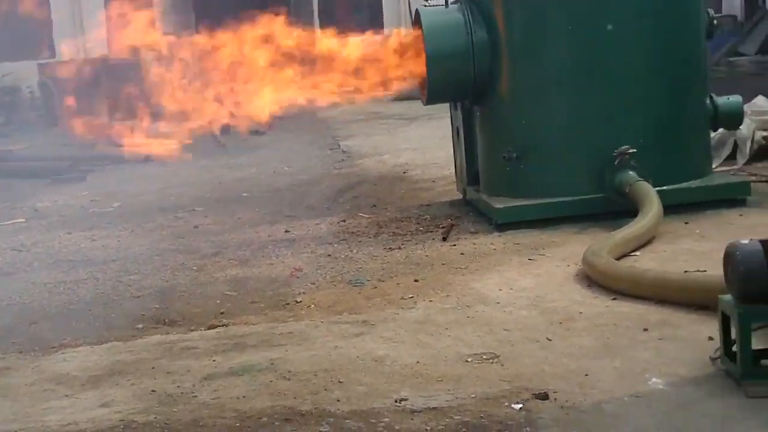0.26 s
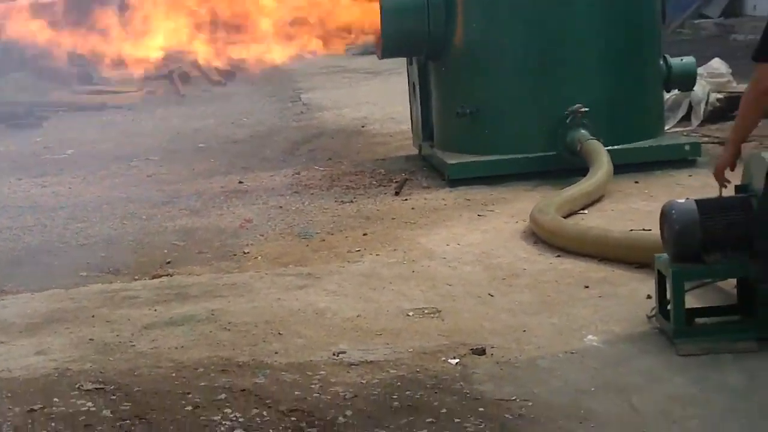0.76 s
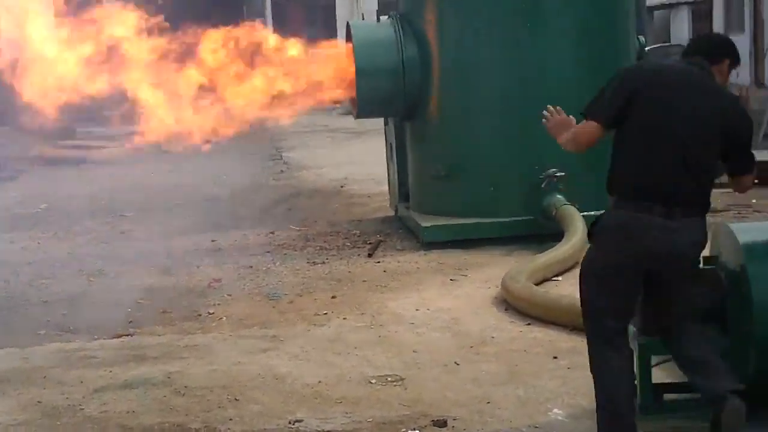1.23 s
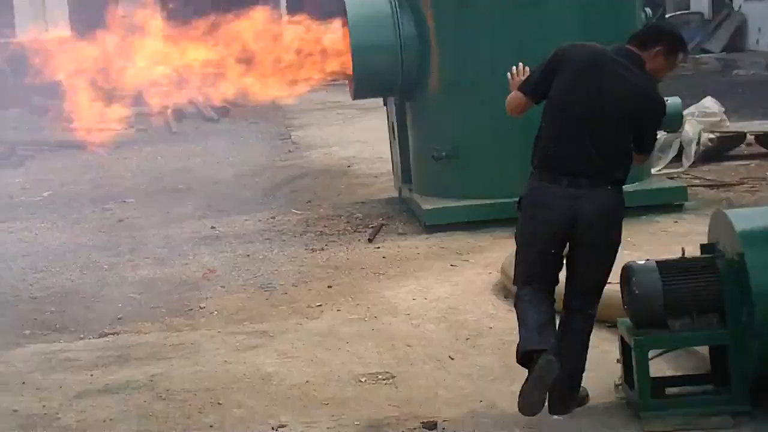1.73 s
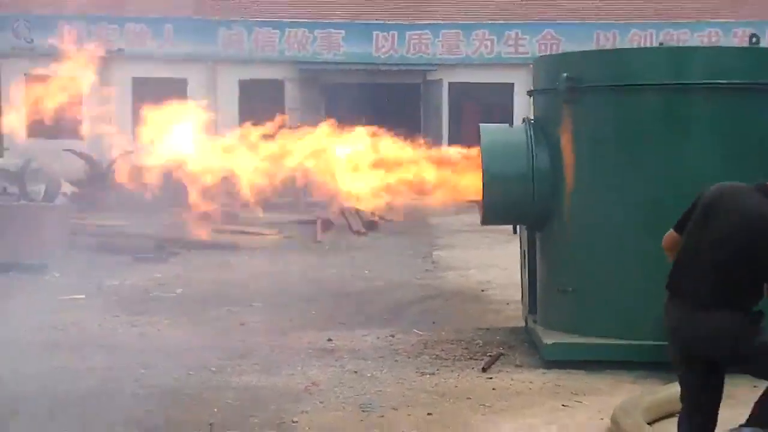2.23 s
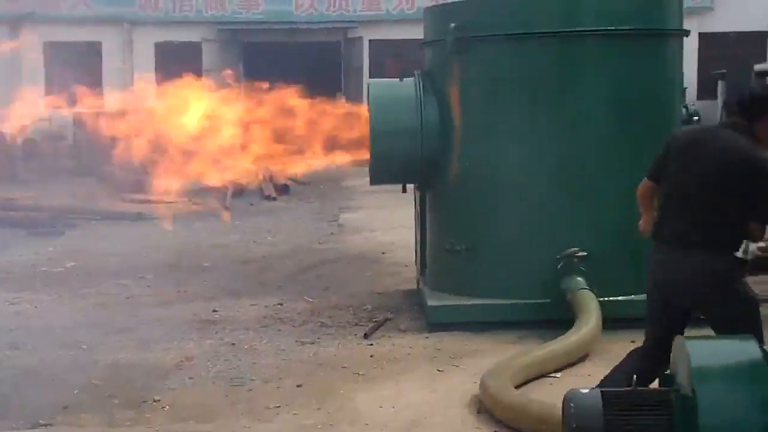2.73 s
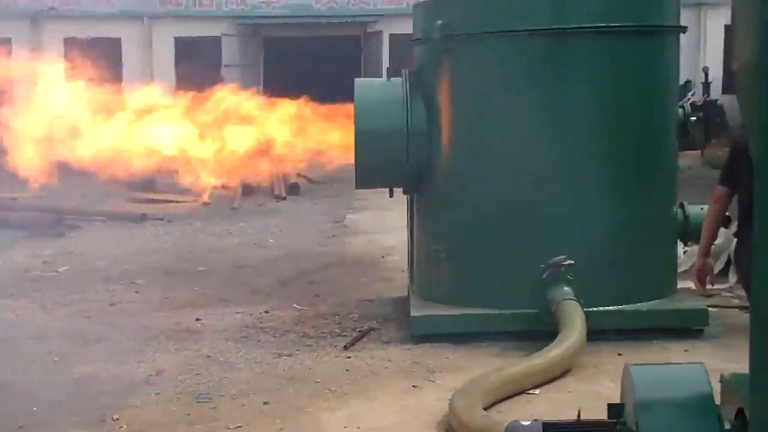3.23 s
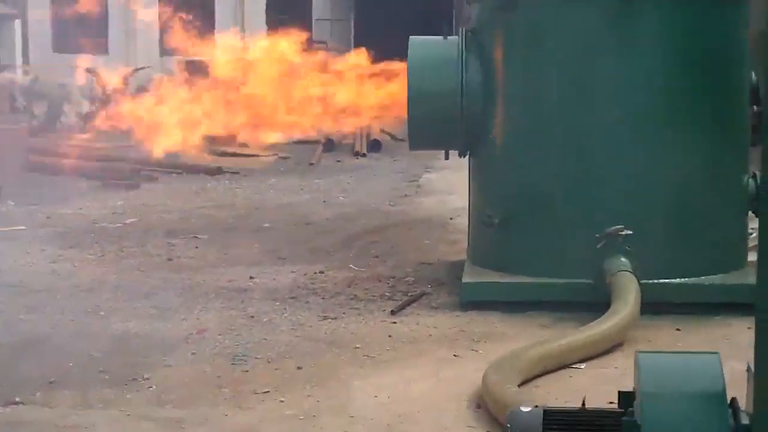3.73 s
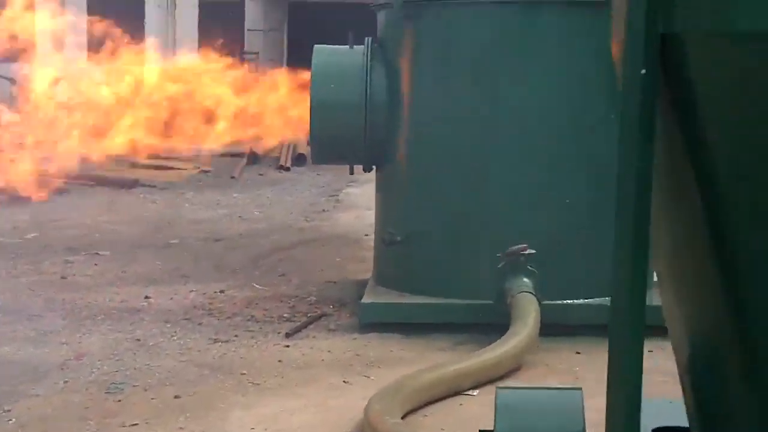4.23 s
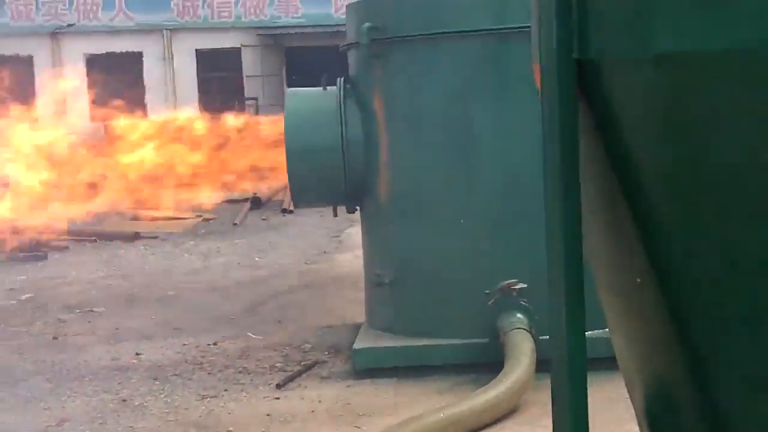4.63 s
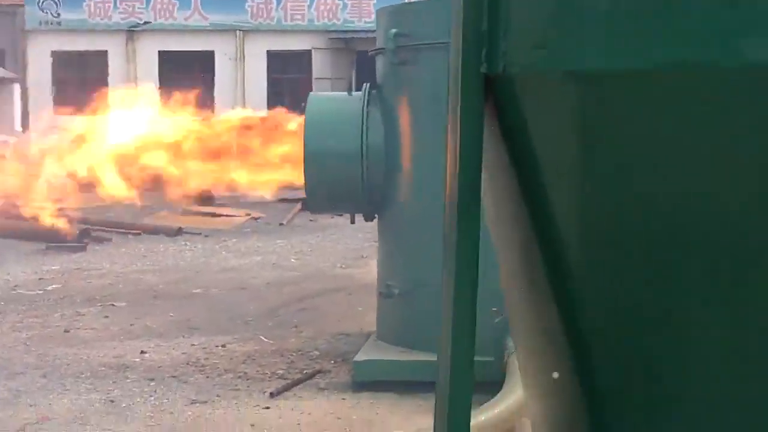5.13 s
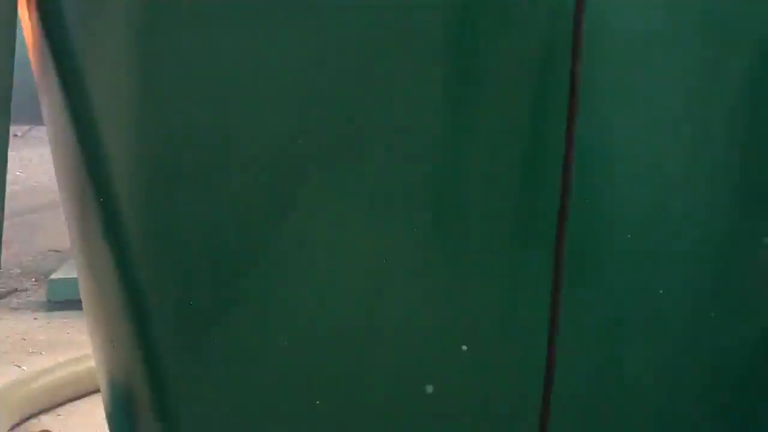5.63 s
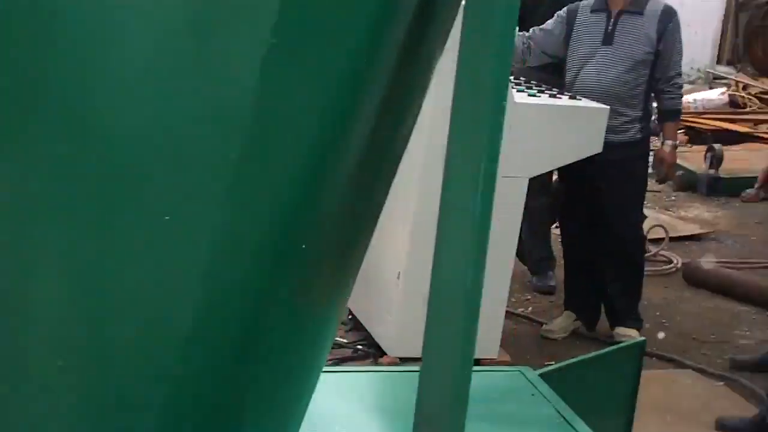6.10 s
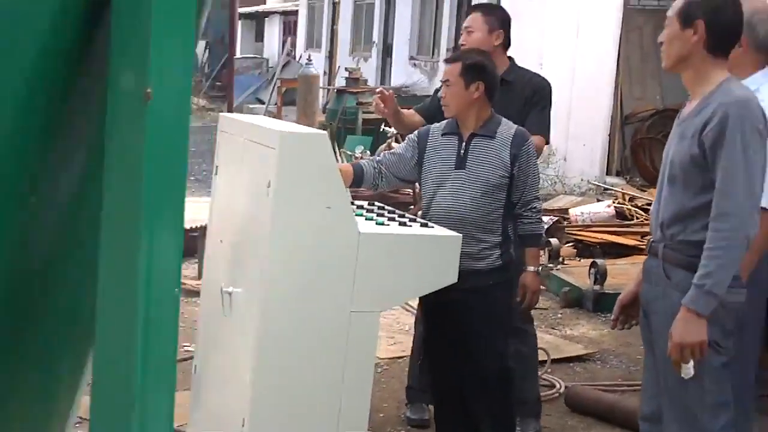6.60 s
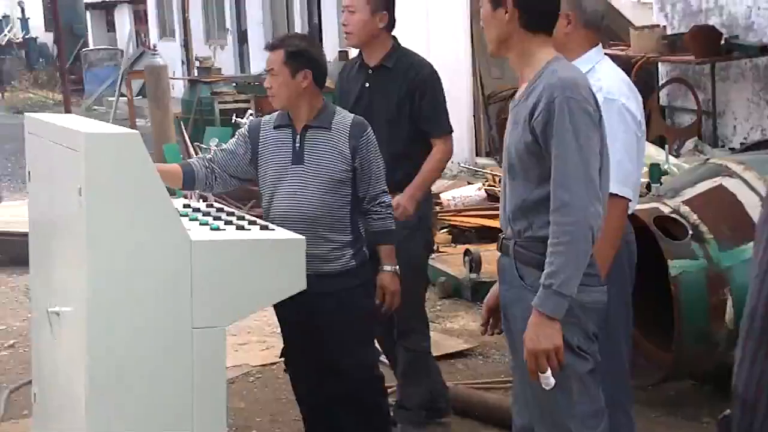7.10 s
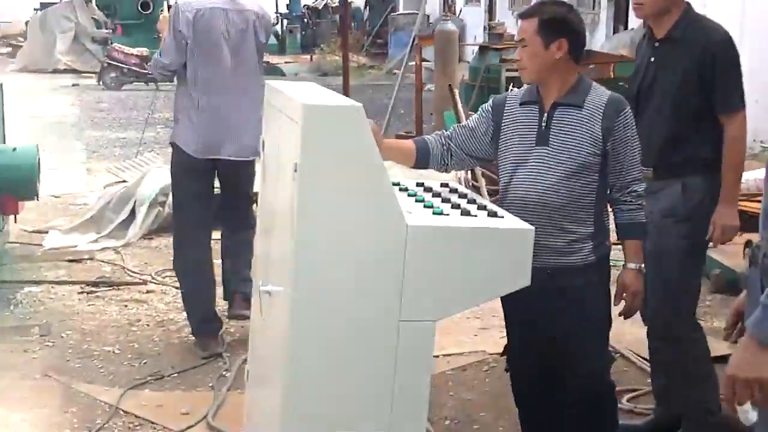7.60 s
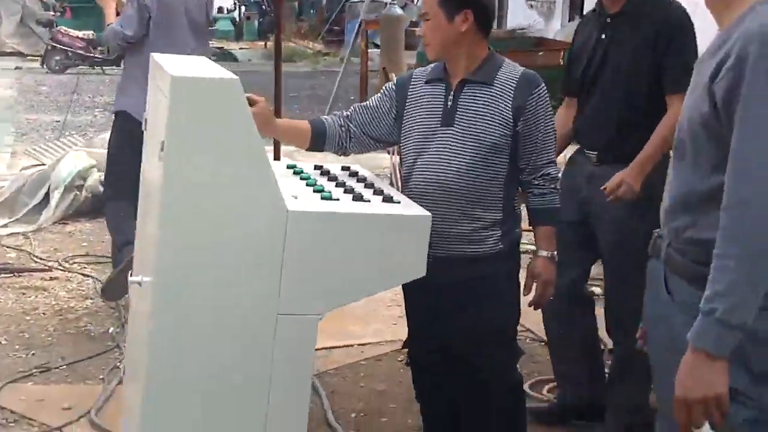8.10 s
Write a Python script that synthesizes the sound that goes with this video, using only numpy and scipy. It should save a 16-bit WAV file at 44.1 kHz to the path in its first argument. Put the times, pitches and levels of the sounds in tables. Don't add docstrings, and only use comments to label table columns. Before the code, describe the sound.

In a hard-walled factory yard, a large burner blasts a continuous low, lumpy roar with soft hiss over a wavering blower hum and faint motor whine. Small chips tick on steel from the start; from two seconds louder chunks crack close to the phone microphone, densest between three and six seconds. The roar loses its open edge behind a hopper as the blower swells, and a hollow knock and tumbling chunks end it.

```python
import sys
import numpy as np
from scipy import signal
from scipy.fft import rfft, irfft
from scipy.io import wavfile
from scipy.ndimage import uniform_filter1d

SR = 44100
rng = np.random.default_rng(int(sys.argv[2]) if len(sys.argv) > 2 else 0)


def gain_from_decibels(decibels):
    exponent = np.asarray(decibels, float) / 20
    return 10 ** exponent


def file_out(sig):
    cols = np.atleast_2d(sig).T
    lim = np.clip(cols, -1, 1)
    pcm = np.round(lim * 32767).astype(np.int16)
    wavfile.write(sys.argv[1], SR, pcm)


N = 368235

# pitch_hz, density_db [dB per Hz]
RUMBLE_SPECTRUM = [(10, -8), (22, -1.5), (32, 3), (55, 3.5), (90, -4), (150, -29.5), (300, -81.5)]
BODY_SPECTRUM = [(40, -17), (80, -2), (125, 1.5), (180, -1), (260, -7.5), (400, -23.5), (800, -55)]
THROAT_SPECTRUM = [(150, -19), (300, -9), (400, -2), (520, -3.5), (700, 2.5), (950, -6.5), (1200, -19),
                   (1800, -16), (4000, -57)]
HISS_SPECTRUM = [(500, -29), (1000, 0.5), (1500, -1.5), (2200, -6), (3000, -4), (4000, -9.5), (5000, -11.5),
                 (6000, -15.5), (7000, -25.5), (9000, -64.5)]
# pitch_hz, density_db [dB per Hz]
SHADED_THROAT_SPECTRUM = [(150, -26.5), (300, 6), (400, -0.5), (520, -1), (700, -4), (950, -10),
                          (1200, -14.5), (1800, -13.5), (4000, -62.5)]
SHADED_HISS_SPECTRUM = [(500, -27.5), (1000, -4), (1500, -2.5), (2200, -0.5), (3000, -4), (4000, -7.5),
                        (5000, -8.5), (6000, -21.5), (7000, -27.5), (9000, -62)]
# start_s, share [0-1]
HOPPER_SHADE = [
    (0, 0),
    (4.9, 0.04),
    (6.1, 1),
    (8.35, 1),
]
# start_s, draught_db
DRAUGHT = [(0.0, -20), (0.11, -17.5), (0.28, -25.5), (0.42, -17), (0.93, -21), (1.6, -16.5), (1.7, -23.5),
           (1.84, -16), (3.32, -17.5), (3.37, -16), (3.81, -21.5), (3.86, -16.5), (5.02, -19.5),
           (5.3, -16.5), (5.32, -19), (8.35, -22.5)]
# start_s, flow_db
FUEL_FLOW = [(0.0, -39), (0.51, -37), (0.86, -40.5), (1.95, -36), (2.14, -39.5), (3.14, -38.5),
             (3.37, -37.5), (3.51, -36), (3.65, -35), (4.47, -36.5), (4.7, -34), (5.49, -37), (5.7, -33.5),
             (6.09, -37), (6.44, -31.5), (6.56, -38), (7.46, -39.5), (8.35, -34.5)]
# level_db, draught_share, fuel_share [both of the swing in dB], hopper_change_db
EDDY_LEVELS = [
    (-20, 0.87, 0.043, 3.5),
    (-20, .8, 0.053, -1.5),
    (-31, 0.4, 0.36, 4),
    (-34.5, 0.14, .9, -1.1),
]

# start_s, level_db
BLADE_LEVEL = [(0.0, -21), (0.75, -26), (1.3, -32), (1.65, -19), (2.39, -29.5), (2.63, -22), (2.95, -28),
               (3.3, -22), (3.72, -35), (4.04, -22.5), (4.47, -34.5), (4.58, -24.5), (4.86, -37),
               (5.25, -17), (5.74, -21.5), (6.05, -12.5), (7.46, -13), (7.81, -21)]
# start_s, level_db
OCTAVE_LEVEL = [(0.0, -49), (0.4, -40), (0.72, -31), (1.2, -45), (1.85, -37.5), (2.5, -49), (4.8, -39),
                (5.28, -32), (5.6, -48), (5.86, -29), (6.1, -40.5), (6.9, -32.5), (7.44, -32.5),
                (7.68, -38.5), (8.35, -31)]
# start_s, level_db
WHINE_LEVEL = [(0.0, -50), (0.55, -40), (0.75, -52), (1.6, -46), (3.0, -50.5), (3.45, -40), (4.0, -46),
               (4.14, -36), (4.6, -40), (4.95, -31), (5.45, -38.5), (5.67, -31), (6.1, -48.5),
               (6.28, -36.5), (6.98, -45.5), (7.1, -34), (7.33, -44), (8.35, -46.5)]
# pitch_hz, level_db [rms], fade_start_s, drift_hz_per_s
CASING_HUMS = [
    (338.6, -45.5, 0.63, 2),
    (377.4, -37, 0.86, 17),
    (934, -52, 9, 3),
    (1199, -51.5, 9, 0),
    (1288, -51, 9, -0.5),
    (1730, -55, 9, -0.5),
]

# start_s, peak_db, ring_hz [loudest], panel_db [low panel share], extra_treble_db
BIG_CRACKS = [(1.9942, -8, 2820, -10.5, -5), (3.093, -11, 4150, -6.5, 2.5), (3.317, -4.5, 2380, -8, 5),
              (3.407, -2, 3240, -8, -2), (3.635, -10.5, 2980, -4.5, -2), (4.677, -13, 2400, -24, -4.5),
              (4.8593, -11, 3570, -7, -2), (5.1401, -11.5, 3260, -2.5, -2.5),
              (5.2346, -11.5, 1900, -10.5, -4), (5.5138, -9, 2665, -1, 3), (5.665, -5, 1670, 0, 2),
              (5.8145, -11.5, 1940, -8, -4)]
# start_s, peak_db, ring_hz [loudest], panel_db [low panel share]
CHUNK_KNOCKS = [(0.3153, -19, 1867, -14), (0.482, -18, 1710, -19.5), (0.7093, -20, 1750, -35),
                (1.511, -16.5, 2590, -17), (1.594, -17, 1750, -25), (1.956, -16.5, 2570, -14),
                (2.4595, -16, 2770, -21), (2.6235, -14, 1580, -4.5), (2.6976, -16.5, 2880, -7),
                (3.5304, -14, 3540, -7), (3.6057, -16, 1468, -11.5), (4.5759, -18.5, 3240, -2.5),
                (6.114, -16.5, 2740, -6), (6.31, -17.5, 1750, -2), (6.402, -14, 2540, -6),
                (6.445, -22.5, 3520, -4.5), (6.496, -20.5, 4000, -10.5), (6.5499, -18, 3850, -30.5)]
# start_s, peak_db, ring_hz [loudest]
CHIP_TICKS = [(0.1495, -21, 1750), (0.391, -22.5, 1840), (1.2535, -21, 2560), (1.3648, -22, 1930),
              (1.4726, -24, 1840), (1.6687, -25, 3740), (2.5337, -17.5, 1500), (3.8922, -21, 1500),
              (4.0278, -18.5, 1450), (4.2765, -34, 1662), (4.6038, -24.5, 3340), (5.038, -40, 1620),
              (5.7845, -15, 1490), (5.9953, -29, 2100), (6.0464, -22.5, 1800), (6.092, -26, 1720),
              (6.2642, -19.5, 2620), (6.774, -19, 1440), (6.8609, -22, 2590), (6.9187, -23, 1490),
              (7.1403, -26.5, 1950), (7.3776, -24.5, 1740), (8.208, -26, 2780), (3.9665, -21, 2200),
              (4.2322, -29, 1740), (5.069, -22.5, 3310), (6.962, -23.5, 1450), (5.73, -27.5, 3480),
              (6.376, -25, 2100)]
# start_s, peak_db, ring_hz [loudest], blow_ms
CHUNK_TUMBLES = [(1.0898, -25.5, 2670, 17), (1.171, -21, 3193, 29), (1.768, -25, 2880, 24),
                 (1.8406, -14, 1750, 13.5), (3.7741, -25, 2784, 23), (4.137, -22, 3050, 17),
                 (5.4115, -18.5, 1750, 40), (6.343, -14, 1750, 18), (7.0739, -19.5, 1830, 23),
                 (7.6604, -7.5, 1800, 18), (7.705, -21.5, 2130, 24), (7.7438, -20, 2900, 25),
                 (7.79, -22.5, 2390, 34), (7.874, -17, 1940, 21), (8.112, -18.5, 1560, 24),
                 (8.29, -9.5, 1716, 21)]
# start_s, peak_db, ring_hz
FAR_THUD = [
    (7.492, -20, 738),
    (7.509, -29, 1140),
]
# ring_hz, treble_db
SPOT_TREBLE = [(1450, -9), (1750, -9), (1900, -9), (2450, -13), (2750, -12.5), (2950, -5.5), (4000, -10)]
# ring_hz, level_db, t60_s
CLEAR_MODES = [(910, 7.5, 0.65), (935, 9.5, 0.11), (1030, -1, 0.22), (1750, 6.5, 0.35), (1840, -3.5, 0.22),
               (2950, 3.5, 0.018), (4560, 2, 0.44)]
# ring_hz, t60_s
SHEET_T60 = [(800, 0.35), (2000, 0.12), (4000, 0.086), (7000, 0.038)]

# pitch_hz, step_db
ROUNDING_STEP = [(2500, -28), (3500, -1.5), (4200, .9), (5500, 1.6), (6500, .6), (7100, 0), (7250, 9),
                 (7400, 30)]


def flame():
    behind = np.clip(curve(HOPPER_SHADE, count=1), 0, 1)
    rumble = turbulence(RUMBLE_SPECTRUM, patchy_db=1.53, flicker_db=0.66, flicker_hz=5.2, size=4096)
    body = turbulence(BODY_SPECTRUM, patchy_db=1.3, flicker_db=-0.8, flicker_hz=26.2, size=2048)

    roar = dict(patchy_db=1.3, flicker_db=0.1, flicker_hz=8.3, size=1024)
    throat = walk_round(turbulence(THROAT_SPECTRUM, **roar), turbulence(SHADED_THROAT_SPECTRUM, **roar), behind)
    fine = dict(patchy_db=1.0, flicker_db=1.52, flicker_hz=30.8, size=512)
    hiss = walk_round(turbulence(HISS_SPECTRUM, **fine), turbulence(SHADED_HISS_SPECTRUM, **fine), behind)

    controls = np.array([np.ones(N), swing(DRAUGHT), swing(FUEL_FLOW), behind])
    levels_db = np.array(EDDY_LEVELS) @ controls
    return (gain_from_decibels(levels_db) * [rumble, body, throat, hiss]).sum(axis=0)


def turbulence(spectrum, patchy_db, flicker_db, flicker_hz, size):
    frames, hz = 4 * N // size + 5, np.fft.rfftfreq(size, 1 / SR)
    real, imaginary, patches = rng.standard_normal((frames, len(hz), 3)).T
    patches = uniform_filter1d(patches, size=9, axis=0)
    patches = evened(uniform_filter1d(patches, size=9, axis=1))
    level_db = read(spectrum, hz)[:, None] + patchy_db * patches
    z = (real + 1j * imaginary) * gain_from_decibels(level_db)
    x = signal.istft(z, nperseg=size, noverlap=3 * size // 4)[1][:N]
    return evened(x * gain_from_decibels(flicker_db * wander(flicker_hz)))


def walk_round(front, back, behind):
    turn = np.pi / 2 * behind
    return np.cos(turn) * front + np.sin(turn) * back


def feed():
    steel = sheet_steel()
    blows = [(*row, 9.9, extra_db) for *row, extra_db in BIG_CRACKS]
    blows += [(*row, 10.3, 0) for row in CHUNK_KNOCKS]
    blows += [(*row, -8.5, 9.2, 0) for row in CHIP_TICKS]
    # panel -9 dB, treble duller by 3 dB
    blows += [(s, db, hz, -9, ms, -3) for s, db, hz, ms in CHUNK_TUMBLES]

    out = np.zeros(N)
    for s, db, hz, panel_db, ms, extra_db in blows:
        treble_db = read(SPOT_TREBLE, hz) + extra_db
        blow = knock(steel, hz, panel_db, treble_db, ms, rng.standard_normal(9400))
        add(out, s - .001, gain_from_decibels(db) * blow)
    soft_start = np.minimum(np.arange(9000) / SR / 0.0046, 1)
    for s, db, hz in FAR_THUD:
        add(out, s, gain_from_decibels(db) * soft_start * ring(hz, 0.15)[0])
    return out + gain_from_decibels(-48) * evened(patter(steel, hits_per_s=17))


def patter(steel, hits_per_s):
    size = gain_from_decibels(3.5 * np.minimum(rng.exponential(1, N), 1.6)) * (rng.random(N) < hits_per_s / SR)
    kind = rng.integers(0, 12, N)
    out = np.zeros(N)
    for k, hz in enumerate(np.geomspace(1600, 5000, 12)):
        chip = knock(steel, hz, -6.0, -6.0, 9.0, rng.standard_normal(9400))
        out += signal.oaconvolve(size * (kind == k), chip)[:N]
    return out


def knock(steel, ring_hz, panel_db, treble_db, blow_ms, chance):
    hz, db, rings = steel
    colour = [(500, panel_db - 15), (700, panel_db + 4.5), (900, panel_db + 10.5), (1250, panel_db + 7.5),
              (1700, 0.0069), (3000, 0.012),
              (4600, treble_db + 7.5), (5800, treble_db + 4.5), (7200, treble_db - 8.5)]
    weight = gain_from_decibels(db + read(colour, hz)) * np.tanh(1.4 * chance[:len(hz)])
    answer = weight @ rings + gain_from_decibels(11) * ring(ring_hz, 0.13)[0]

    u = np.arange(len(answer)) / SR * 1000 / np.clip(blow_ms, .5, 30)
    f = np.fft.rfftfreq(len(u), 1 / SR)
    swell_db = 5.3 * np.exp(-((f - ring_hz) / 480) ** 2)
    splinters = rfft(chance[-len(u):]) * gain_from_decibels(read(colour, f) + swell_db)
    splinters = evened(irfft(splinters, len(u)))
    rise = np.minimum(u * 42 / blow_ms, 1)
    burst = splinters * rise * (np.exp(-(u / 1.3) ** 3) + 0.3 * np.exp(-u / 3.6))

    rung = answer / np.sqrt(np.mean(answer[:400] ** 2)) * np.minimum(u * 1.1, 1)
    sound = burst + 0.5 * rung
    return sound / np.abs(sound).max()


def sheet_steel():
    dense = np.linspace(760, 7200, num=320) + 7 * rng.standard_normal(320)
    dense_t60 = read(SHEET_T60, dense) * rng.uniform(.7, 1.3, len(dense))
    clear, clear_db, clear_t60 = np.transpose(CLEAR_MODES)
    hz = np.r_[dense, clear]
    return hz, np.r_[0 * dense, clear_db], ring(hz, np.r_[dense_t60, clear_t60])


def ring(hz, t60):
    t = np.arange(9000) / SR
    decay = gain_from_decibels(-60 * t / np.reshape(t60, (-1, 1)))
    return decay * np.sin(2 * np.pi * np.reshape(hz, (-1, 1)) * t)


def machines():
    t = np.arange(N) / SR
    blade_hz = 296.9 + 0.35 * wander(4.2)
    out = tone(blade_hz, curve(BLADE_LEVEL, count=1), 0.37, 0.089)
    out += tone(2 * blade_hz, curve(OCTAVE_LEVEL, count=1) + 2.5 * wander(2.4), 0.29, 0.6)
    out += tone(1388 + 0.8 * wander(2.5), curve(WHINE_LEVEL, count=1), 1.2, 0.26)
    for hz, db, fade_s, drift in CASING_HUMS:
        hum_db = db + 2.1 * wander(0.93) - 45 * np.maximum(t - fade_s, 0)
        out += tone(hz + drift * np.minimum(t, fade_s), hum_db, 1.4, 0.86)
    return out


def tone(hz, db, flutter_db, jitter_rad):
    phase = 2 * np.pi * np.cumsum(hz * np.ones(N)) / SR + jitter_rad * wander(7.9)
    level = np.sqrt(2) * gain_from_decibels(db + flutter_db * wander(40))
    return level * np.sin(phase + 2 * np.pi * rng.random())


def yard(x):
    taps = np.zeros(SR // 2)
    at = np.arange(400, len(taps) - 20, 20)
    taps[at + rng.integers(0, 20, len(at))] = rng.choice([-1., 1.], len(at))
    hz, t, z = signal.stft(taps, SR, nperseg=256)
    t60_s = read([(800, 0.68), (6000, 0.16)], hz)[:, None]
    tail = signal.istft(z * gain_from_decibels(-60 * t / t60_s), SR, nperseg=256)[1]
    z = rfft(tail)
    z = z / np.sqrt(uniform_filter1d(abs(z) ** 2, size=50))
    tail = irfft(z, len(tail))
    return signal.fftconvolve(x, tail / np.linalg.norm(tail))[:N]


def evened(x):
    return x / np.sqrt(np.mean(x ** 2) + 1e-20)


def read(points, hz):
    f, value = np.transpose(points)
    return np.interp(np.log(hz + 1), np.log(f + 1), value)


def curve(table, count):
    rows = np.array(table)
    return np.interp(np.arange(N) / SR, rows[:, 0], rows[:, count])


def swing(table):
    x = curve(table, count=1)
    return x - x.mean()


def wander(top_hz):
    z = rfft(rng.standard_normal(N))
    lowpass = np.exp(-(np.fft.rfftfreq(N, 1 / SR) / top_hz) ** 2)
    return evened(irfft(z * lowpass, N))


def add(mix, s, sound):
    part = mix[round(s * SR):][:len(sound)]
    part += sound[:len(part)]


def scene():
    steel = feed()
    return (flame() + machines() + steel + gain_from_decibels(-5.0) * yard(steel))[None]


def phone_rounding(x, size=1024):
    n, k = np.arange(2 * size) + .5, np.arange(size) + .5
    window = np.sin(np.pi * n / (2 * size))
    basis = np.sqrt(2 / size) * window * np.cos(np.pi / size * np.outer(k, n + size / 2))
    blocks = np.pad(x, (size + 300, 3 * size - (N + 300) % size)).reshape(-1, size)
    lines = np.hstack([blocks[:-1], blocks[1:]]) @ basis.T

    level_db = 10 * np.log10((lines ** 2).reshape(len(lines), -1, 16).mean(axis=2) + 1e-12)
    band_db = .8 * level_db + 2.2 * rng.standard_normal(level_db.shape)
    treble_db = level_db[:, 8:20].mean(axis=1)
    jump_db = np.diff(treble_db, prepend=treble_db[0])
    band_db = band_db - 1.8 * np.clip(jump_db - 3.5, 0, 7)[:, None]

    step = gain_from_decibels(read(ROUNDING_STEP, k * SR / (2 * size)) + np.repeat(band_db, 16, axis=1))
    rounded = np.sign(lines) * np.floor(np.abs(lines) / step + .41) * step
    halves = rounded @ basis
    return (halves[1:, :size] + halves[:-1, size:]).ravel()[300:300 + N]


def low_pass(x):
    return signal.sosfilt(signal.butter(12, 7450, fs=SR, output="sos"), x)


def record(dry):
    soft = 0.94 * np.tanh(dry / 0.99)
    edge = signal.firwin(255, 7520, window=("kaiser", 9), fs=SR)
    banded = signal.oaconvolve(soft[0], edge, "same")
    mix = phone_rounding(banded)[None]
    return low_pass(mix)


dry = scene()
out = record(dry)
file_out(out)
```